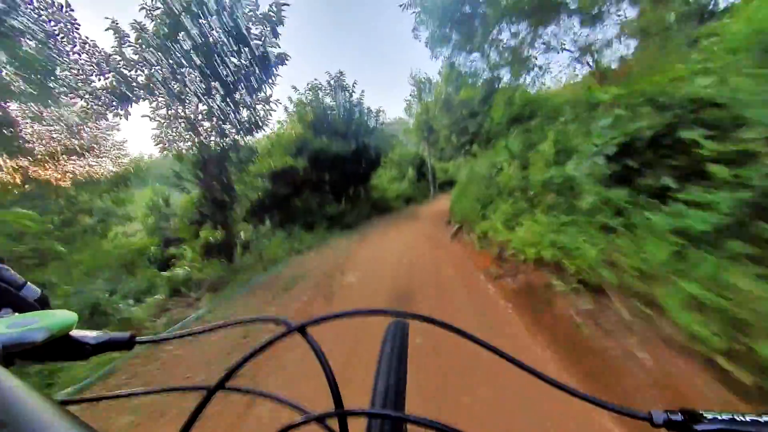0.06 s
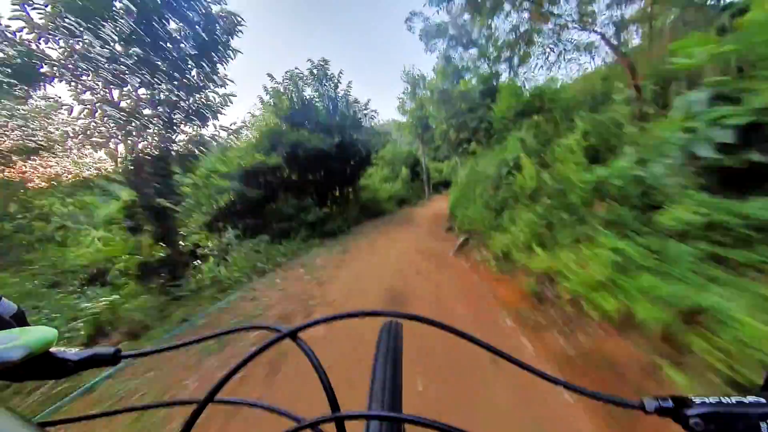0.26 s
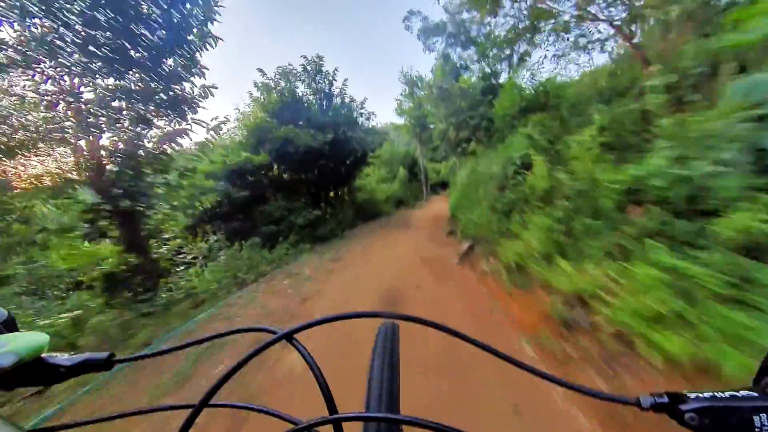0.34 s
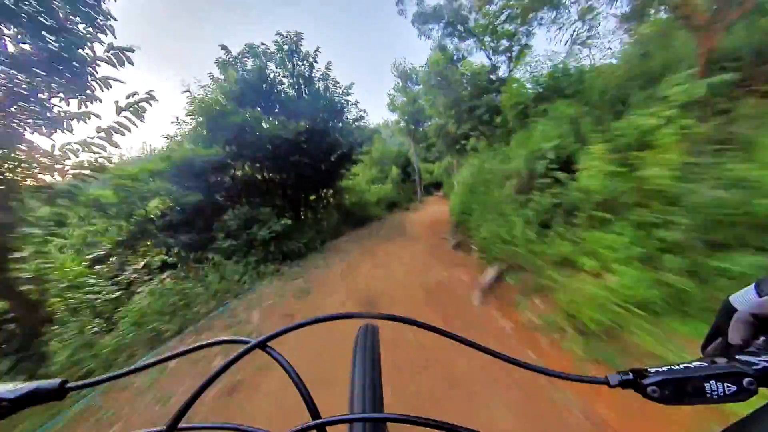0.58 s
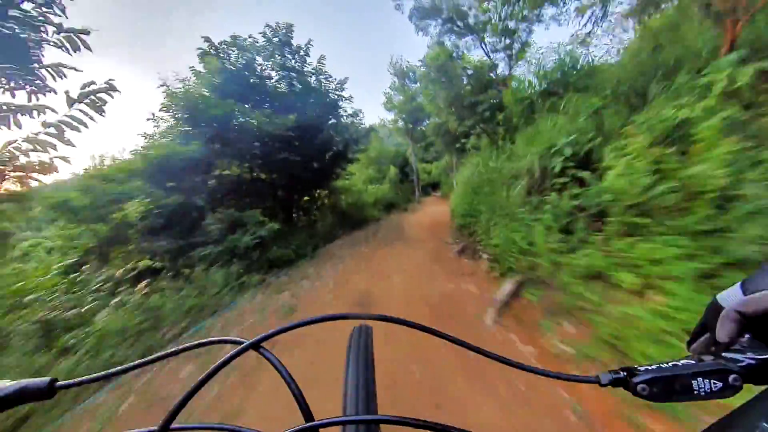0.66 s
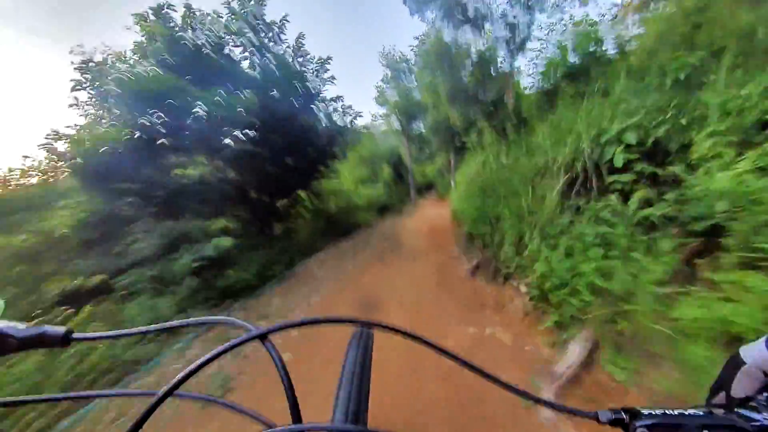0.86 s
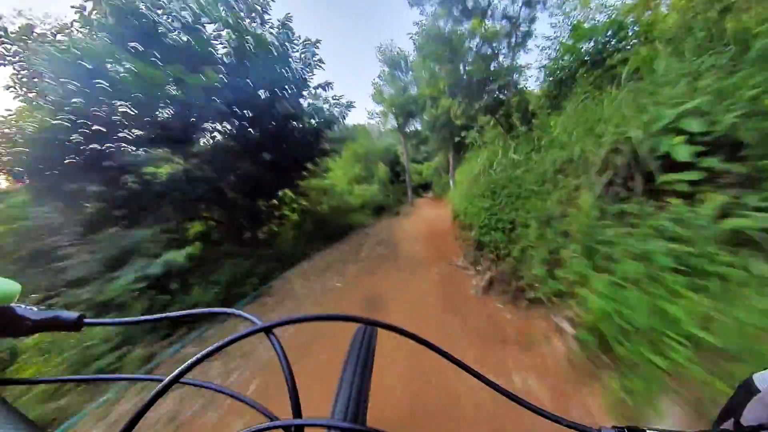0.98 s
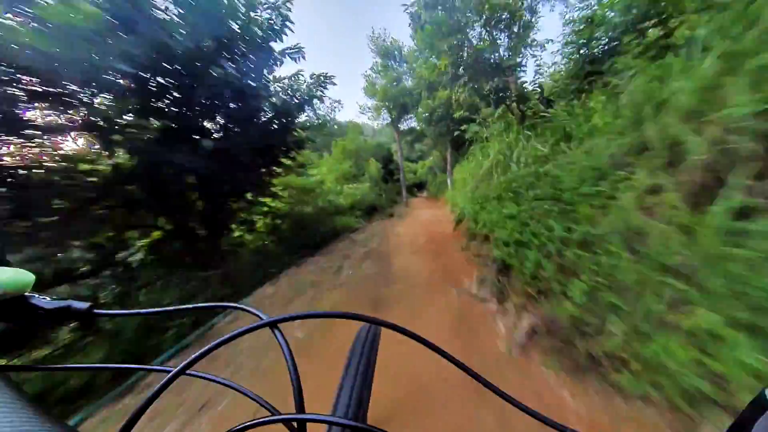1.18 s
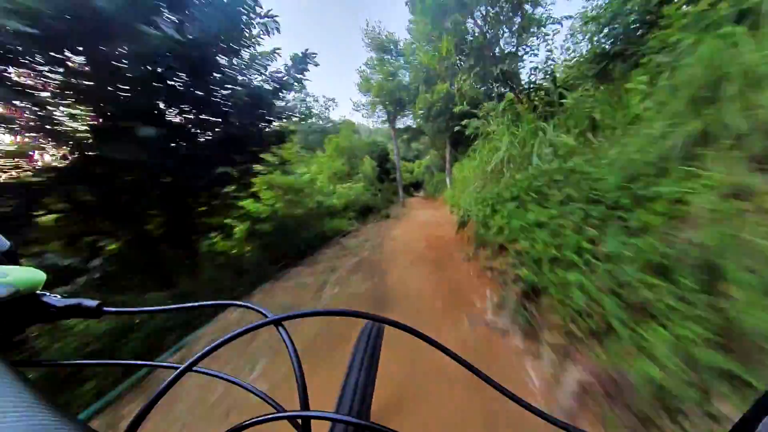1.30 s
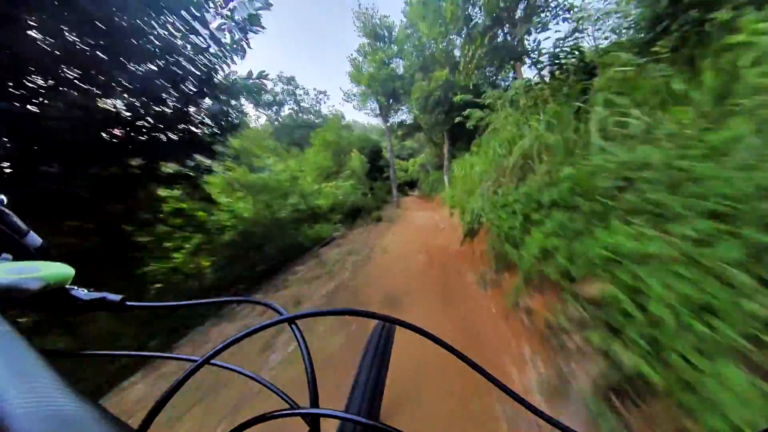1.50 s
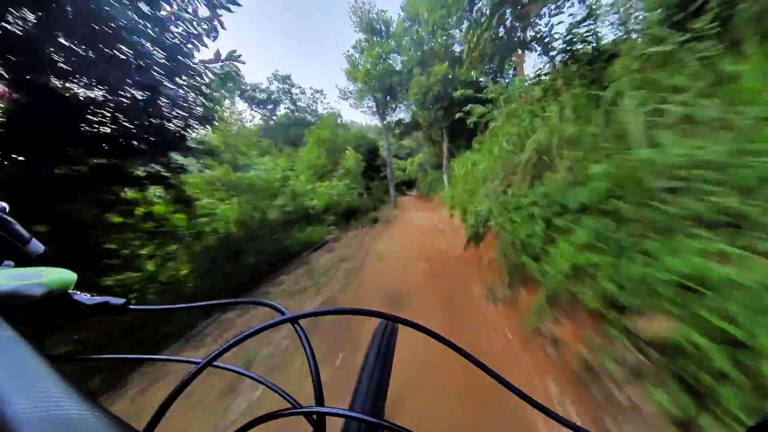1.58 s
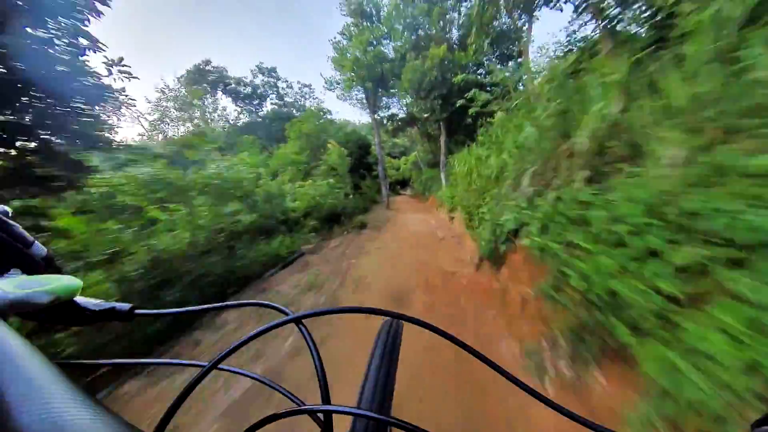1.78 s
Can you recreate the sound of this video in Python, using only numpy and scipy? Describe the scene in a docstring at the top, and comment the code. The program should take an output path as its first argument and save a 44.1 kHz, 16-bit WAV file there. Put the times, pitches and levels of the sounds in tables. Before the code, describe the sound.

A mountain bike hits two hard bumps on a dirt trail, each a hollow thump with a plastic clack and chain slap. Smaller knocks fall between them, then faint tyre rumble remains, heard from a microphone riding along.

```python
"""A mountain bike rolls down a dirt trail, heard from a camera riding with it.
It starts with tyre rumble, grit, a little wind and a thin whine. At 0.2 s a hard bump sets the camera
mount booming and its plastic joint clacking, enough to overload, and the chain slaps the frame.
Smaller knocks, thrown sand and faint brake chirps follow, then a second hard bump at 1 s.
Last, the ground gets smoother and quieter, and the mount hums briefly near 1.5 s."""
import sys
import numpy as np
from scipy import signal
from scipy.fft import rfft, irfft
from scipy.io import wavfile
from scipy.ndimage import uniform_filter1d

SR = 44100
rng = np.random.default_rng(int(sys.argv[2]) if len(sys.argv) > 2 else 0)


def dump_mix(stems):
    """Bounce the given channels to the path in sys.argv[1] as a 16-bit WAV at rate SR."""
    frames = np.atleast_2d(stems).T  # one column per channel
    limited = np.clip(frames, -1, 1)  # hard clip at full scale
    pcm = np.round(limited * 32767).astype(np.int16)
    wavfile.write(sys.argv[1], SR, pcm)


N = 81585
TIME = np.arange(N) / SR

# Bumps that shake the mount (time [s], level [dB], pitch [Hz], rise [s], fall [s], left over right [dB])
BUMPS = [(0.056, -36.5, 190, 0.012, 0.016, 40.5), (0.15, -30.5, 240, 0.0046, .014, -23.5),
         (0.2016, -2.5, 243, 0.0053, 0.01, -20), (0.305, -32, 221, .011, 0.0064, 8.5),
         (0.320, -30.5, 200, .007, .007, -5.5), (0.364, -18.5, 222, 0.0059, 0.0081, -34.5),
         (0.384, -37, 205, 0.0041, 0.02, -16), (0.649, -32.5, 281, 0.0051, 0.0036, 12),
         (0.663, -37.5, 303, 0.0032, 0.0037, 12), (0.699, -35, 225, 0.0072, 0.0098, 9),
         (0.718, -41.5, 214, 0.0068, 0.0077, 15), (0.956, -29, 229, .009, 0.0024, -14.5),
         (0.9957, -3.5, 260, 0.01, 0.0029, -18), (1.025, -45.5, 280, 0.0052, 0.017, -4),
         (1.145, -54.5, 310, 0.016, 0.017, -0.5)]
# Clacks of the plastic joint (time [s], level [dB], chatter length [s], pitch [ratio])
CLACKS = [(0.162, -41, 0.015, 1), (0.2035, -18, 0.0032, 1.073), (0.3222, -36.5, 0.013, 0.98),
          (0.364, -31, 0.0093, 0.994), (0.958, -48, 0.014, .97), (0.9985, -23.5, 0.0089, 1)]
# Tones the joint rings with (pitch [Hz], level [dB], time to fade 60 dB [s])
JOINT_TONES = [(728.7, 4, 0.02), (824, -9, 0.043), (936, -10.5, .022), (455, -9.5, .032),
               (1370, -25, 0.024)]
# Chain slaps (time [s], level [dB], length [s], brightest at [Hz], width [octaves], left over right [dB])
SLAPS = [(0.11, -61.5, 0.011, 1900, 0.61, -6.5), (0.131, -46.5, 0.017, 442, 0.62, 5),
         (0.133, -54.5, 0.019, 2500, 0.12, 8.5), (0.194, -37, 0.0075, 1480, 0.27, -7.5),
         (0.2053, -31.5, 0.0063, 847, .9, -15.5), (0.31, -60.5, 0.02, 1700, .7, -7.5),
         (0.356, -53.5, 0.029, 1200, 0.53, -15.5), (0.533, -73, 0.042, 2160, 0.54, -3),
         (0.658, -59, 0.013, 2360, 0.22, 17), (0.704, -73, 0.029, 2400, 0.31, 21),
         (0.847, -76, 0.013, 990, 0.14, 12), (0.949, -53, 0.025, 1280, 0.38, -14.5),
         (0.9908, -40, 0.0039, 1800, 0.13, -4.5), (0.997, -30, 0.015, 950, 0.95, -13),
         (1.0785, -53, 0.012, 1850, 0.74, -5.5), (1.134, -74.5, 0.03, 1410, 0.69, -12.5)]
# Tones the chain and frame ring with (pitch [Hz], level [dB], time to fade 60 dB [s])
FRAME_TONES = [(1000, -5.5, 0.066), (1110, -3.5, .022), (1263, -1.5, 0.062), (1303, -3, .022),
               (1580, -3, .026), (1848, -3, .028), (2080, -5, .024), (2170, -2.5, 0.037),
               (2790, -4.5, 0.01), (3400, -8.5, 0.024), (4150, -17, .028), (4790, -18, .03),
               (5750, -16.5, .03), (8400, -19.5, 0.027)]
# Tone colour of one link's tick (frequency [Hz], level [dB])
TICK_COLOUR = [(200, -6.5), (500, 2), (1500, 2.5), (2400, -8), (4000, -12), (8000, -14.5), (15000, -26.5)]
# Loudness of the tyre rumble (time [s], left [dB], right [dB])
RUMBLE_LEVELS = [(0, -36, -52), (0.08, -63, -46), (0.13, -39.5, -46), (0.27, -49.5, -51),
                 (0.43, -57, -52.5), (0.52, -52, -57.5), (0.6, -60.5, -55), (0.69, -48, -61),
                 (0.78, -53.5, -58), (0.85, -46, -70), (0.91, -60, -79), (1.05, -56.5, -56.5),
                 (1.16, -64, -59.5), (1.23, -71.5, -66.5), (1.58, -69, -63.5), (1.85, -72, -65.5)]
# Tone colour of the rumble on the left (frequency [Hz], level [dB])
RUMBLE_LEFT = [(25, -45.5), (70, -27), (110, -25), (150, -11), (185, -0.5), (250, 2), (330, -3.5),
               (420, -10), (520, -20), (700, -33.5), (1300, -57.5)]
# Tone colour of the rumble on the right (frequency [Hz], level [dB])
RUMBLE_RIGHT = [(25, -43.5), (70, -29.5), (110, -27.5), (150, -17), (185, 9), (240, -15), (330, -13),
                (420, -11.5), (520, -27), (700, -31.5), (1300, -55)]
# Weaker tones in the mount's hum (pitch [Hz], level against the main tone [dB])
HUM_TONES = [(85, -29.5), (400, -22.5), (790, -24.5)]
# How the grit swells and fades (time [s], crunch [dB], hiss [dB])
GRIT_LEVELS = [(0, -67, -74.5), (0.12, -63, -99.5), (0.28, -65.5, -87.5), (0.45, -68, -88.5),
               (0.55, -73.5, -87), (0.72, -75.5, -90), (0.82, -77, -106), (0.91, -83.5, -104.6),
               (1.05, -74, -90.5), (1.14, -74.5, -96), (1.25, -83, -104.3), (1.85, -88, -101.9)]
# Tone colour of the crunch (frequency [Hz], level [dB])
CRUNCH_COLOUR = [(300, -23), (560, -1), (850, 3.5), (1300, -5), (1800, -6), (2500, -7), (3100, -14),
                 (4000, -27), (7000, -52.5)]
# Tone colour of the hiss (frequency [Hz], level [dB])
HISS_COLOUR = [(2000, -20.5), (3800, -1.5), (5500, 3.5), (6600, 1.5), (8200, 1.5), (9500, -8.5),
               (14000, -5.5), (15500, -10.5)]
# Loudness of the whine (time [s], level [dB])
WHINE_LEVELS = [(0, -74.5), (.07, -76), (.17, -92.5), (.22, -70), (.33, -86.5), (.48, -84.5), (.62, -88.5),
                (.88, -85), (1.0, -95), (1.11, -78), (1.22, -101.5), (1.32, -89), (1.44, -99), (1.55, -90),
                (1.67, -101), (1.84, -90)]
# Chirps of the brake disc (time [s], width [s], level [dB])
CHIRPS = [(0.52, 0.044, -78.5), (0.598, 0.0067, -70), (0.669, 0.016, -75.5)]
# Loudness of the thrown sand (time [s], level [dB])
SAND_LEVELS = [(0, -100), (.28, -97), (.38, -81.5), (.68, -86), (.85, -92.5), (.95, -108), (1.85, -108)]
# Tone colour of the sand (frequency [Hz], level [dB])
SAND_COLOUR = [(5000, -31), (8500, -3), (11000, -4), (14500, 0.5), (15700, -1)]

SETTLE_HZ, SAG_S, AFTER_RING_DB, AFTER_RING_S, LEFT_LAG_S = 180, 0.014, -37, 0.014, 0.0012
LINKS_PER_S, TICK_DB, TICK_S, SLAP_RISE_S, MEDIUM_SLAP_DB = 1000, 10.5, 0.00067, 0.0024, -38.5


def mount_boom(db, hz, rise, fall, side_db):
    """A bump sets the mount swinging; the boom dies away as its pitch sinks."""
    t = np.maximum(TIME[:SR // 5] - np.array([[LEFT_LAG_S], [0]]), 0)
    late = np.maximum(t - rise, 0)
    pitch = hz + 0.99 * (SETTLE_HZ - hz) * (1 - np.exp(-(late / SAG_S) ** 1.1))
    swell = np.sin(np.pi / 2 * np.minimum(t / rise, 1)) ** 2
    fade = np.exp(-(late / fall) ** 1.1) + amp(AFTER_RING_DB) * np.exp(-late / AFTER_RING_S)
    tone = np.cos(2 * np.pi * np.cumsum(pitch * (t > 0), 1) / SR)
    return amp(db) * pan(side_db) * swell * fade * tone


def joint_clack(db, length, pitch, rise_s=0.002):
    """The plastic joint chatters for a moment, then its tones ring out."""
    t = TIME[:SR // 6]
    late = np.maximum(t - length, 0)
    ring = sum(amp(d - 60 * late / fade_s) * np.sin(2 * np.pi * (hz * pitch * t + rng.random((2, 1))))
               for hz, d, fade_s in JOINT_TONES)
    return amp(db) * pan(-21.5) * np.minimum(t / rise_s, 1) * ring


def chain_slap(db, length, bright_hz, octaves, side_db):
    """A run of links lands on the frame; each one ticks and makes it ring."""
    t = TIME[:SR // 8]
    jitter, size = rng.random(40), rng.standard_normal(40)
    lands_s = (np.arange(40) + jitter - jitter[0]) / LINKS_PER_S
    force = np.sign(size) * (.6 + abs(size) / 2) * np.exp(-(lands_s / length) ** 4)
    links = np.zeros(len(t))
    np.add.at(links, (lands_s * SR).astype(int), force)
    count = len(FRAME_TONES)
    phases = rng.random((count, 1, 1)) + rng.standard_normal((count, 2, 1)) / 4  # partly alike on each side
    ring = sum(amp(d - 60 * t / fade_s) * np.sin(2 * np.pi * (hz * t + phase))
               for (hz, d, fade_s), phase in zip(FRAME_TONES, phases))
    noise = colour(rng.standard_normal((2, len(t))), TICK_COLOUR)
    tick = 2 * amp(TICK_DB) * np.exp(-t / TICK_S) * unit(blend_sides(noise, 0.26))
    hit = signal.fftconvolve(links[None], ring + tick, axes=1)[:, :len(t)]
    hit *= np.minimum(t / SLAP_RISE_S, 1)
    f = np.fft.rfftfreq(2 * len(t), 1 / SR) + 1
    bright = np.exp(-.5 * (np.log2(f / bright_hz) / octaves) ** 2)
    # Harder slaps ring over a wider range of pitches.
    broad = amp(-16.5 + 0.74 * (db - MEDIUM_SLAP_DB)) / (1 + (f / 2980) ** 2)
    hit = irfft(rfft(hit, 2 * len(t)) * (bright + broad))[:, :len(t)]
    strength = np.sqrt((hit ** 2).sum(1, keepdims=True) / (SR * (length + .004)))
    return amp(db) * pan(side_db) * hit / strength


def echo_tail(knocks, db=-14.5, fade_s=0.031, rise_s=0.02):
    """A short noisy tail follows each knock, like quick echoes off the surroundings."""
    t = TIME[:SR // 6]
    tail = rng.standard_normal((2, len(t))) * amp(-60 * t / fade_s) * np.minimum(t / rise_s, 1)
    return amp(db) * signal.fftconvolve(knocks, tail / np.linalg.norm(tail[0]), axes=1)[:, :N]


def tyre_rumble():
    """Tyres and wind shake the mount, whose own note comes through on the right."""
    left, right = [unit(colour(rng.standard_normal(N), shape)) for shape in (RUMBLE_LEFT, RUMBLE_RIGHT)]
    right += amp(-0.5) * fuzzy_tone(hz=193.7, width_hz=18)[1]
    return np.array(level(RUMBLE_LEVELS)) * [steady(left), steady(right)]


def mount_hum(at_s=1.478, width_s=0.022, hz=187, db=-48):
    """On smoother ground the mount's own tones swell softly and fade."""
    tone = sum(amp(d) * np.sin(2 * np.pi * (f * TIME + rng.random())) for f, d in [(hz, 0)] + HUM_TONES)
    return amp(db) * pan(-20) * np.exp(-((TIME - at_s) / width_s) ** 2) * tone


def grit(grains_per_s=410, grain_share=0.13):
    """Grains of dirt crunch under the tread, over a fine hiss."""
    crunch_gain, hiss_gain = level(GRIT_LEVELS)
    grains = unit((rng.random((2, N)) < grains_per_s / SR) * rng.standard_normal((2, N)))
    dirt = np.sqrt(grain_share) * grains + np.sqrt(1 - grain_share) * rng.standard_normal((2, N))
    dirt = patchy(blend_sides(dirt, 0.15))
    crunch = amp(-1.5) * crunch_gain * unit(colour(dirt, CRUNCH_COLOUR))
    hiss = amp(5.5) * hiss_gain * unit(colour(dirt, HISS_COLOUR))
    return pan(-3) * (crunch + hiss)


def whine(hz=7450, sway_hz=120, wheel_turn_s=0.215, peak_s=1.31, flicker_db=1.5):
    """A thin flickering whine whose pitch sways about as fast as the wheels turn."""
    pitch = hz + sway_hz * np.cos(2 * np.pi * (TIME - peak_s) / wheel_turn_s)
    wobble = unit(uniform_filter1d(rng.standard_normal(N), size=1100))
    tone = unit(blend_sides(fuzzy_tone(pitch, width_hz=65), 0.4))
    return level(WHINE_LEVELS)[0] * unit(amp(flicker_db * wobble)) * tone


def brake_chirps():
    """The brake disc grazes its pads and sings faintly."""
    swell = sum(amp(db) * np.exp(-((TIME - s) / width) ** 2) for s, width, db in CHIRPS)
    return pan(14) * swell * fuzzy_tone(hz=5380, width_hz=58)


def sand(grains_per_s=1600):
    """Fine sand ticks off the tread in a soft sizzle."""
    grains = (rng.random(N) < grains_per_s / SR) * rng.standard_normal((2, N))
    return level(SAND_LEVELS)[0] * unit(colour(patchy(blend_sides(grains, 0.3)), SAND_COLOUR))


def amp(db):
    """Turns decibels into a gain to multiply by."""
    return 10 ** (np.asarray(db) / 20)


def unit(x):
    """Scales a sound to an average strength (rms) of 1."""
    return x / np.sqrt(np.mean(x ** 2) + 1e-20)


def pan(db):
    """Left and right gains, the louder at 1; positive dB leans left."""
    return amp([[min(db, 0)], [min(-db, 0)]])


def blend_sides(x, amount):
    """Mixes a little of each side into the other."""
    return x + amount * x[::-1]


def add(mix, s, sound):
    """Mixes a stereo sound in at time s."""
    part = mix[:, max(round(s * SR), 0):][:, :sound.shape[1]]
    part += sound[:, :part.shape[1]]


def colour(x, points):
    """Shapes lows and highs along a curve of (Hz, dB) points."""
    hz, db = np.transpose(points)
    f = np.fft.rfftfreq(x.shape[-1], 1 / SR)
    return irfft(rfft(x) * amp(np.interp(np.log(f + 1), np.log(hz), db)), x.shape[-1])


def level(rows):
    """One gain curve over time for each dB column of a table."""
    s, *columns = np.transpose(rows)
    return [amp(np.interp(TIME, s, db)) for db in columns]


def steady(x, span_s=0.089):
    """Evens out the slow chance swells of a noise."""
    return x / np.sqrt(abs(uniform_filter1d(x ** 2, int(span_s * SR))) + 1e-12)


def fuzzy_tone(hz, width_hz):
    """Noise in a band so narrow that it has a pitch."""
    noise = rng.standard_normal((2, N)) + 1j * rng.standard_normal((2, N))
    drift = signal.sosfilt(signal.butter(2, width_hz, fs=SR, output="sos"), noise)
    return unit((drift * np.exp(2j * np.pi * np.cumsum(hz * np.ones(N)) / SR)).real)


def patchy(x, depth_db=3.5):
    """Lets narrow bands of a sound come and go at random."""
    bands = signal.stft(x, nperseg=512)[2]
    patches = uniform_filter1d(rng.standard_normal(bands.shape[1:]), size=3, axis=0)
    patches = uniform_filter1d(patches, size=7, axis=1)
    return signal.istft(bands * amp(depth_db * unit(patches)), nperseg=512)[1][:, :N]


def cut_lows(x, hz, order):
    """Weakens everything below hz."""
    return signal.sosfilt(signal.butter(order, hz, "high", fs=SR, output="sos"), x)


def scene():
    """Booms and rattles on top of the rolling noise."""
    booms, rattles = np.zeros((2, 2, N))
    knocks = (booms, BUMPS, mount_boom), (rattles, CLACKS, joint_clack), (rattles, SLAPS, chain_slap)
    for track, table, source in knocks:
        for s, *row in table:
            add(track, s, source(*row))
    booms = cut_lows(booms, hz=130, order=2)  # the mount passes little deep bass
    rolling = tyre_rumble() + grit() + sand() + mount_hum() + whine() + brake_chirps()
    return booms + rattles + echo_tail(rattles) + rolling


def record(dry, overload_db=-6, knee=2.4, top_hz=15700):
    """The microphones overload softly on hard bumps; the deepest bass and top treble are cut."""
    ceiling = amp(overload_db) * (1 - 0.045 * np.sign(dry))  # one half of the wave is squeezed more
    squashed = dry / (1 + abs(dry / ceiling) ** knee) ** (1 / knee)
    treble_cut = signal.firwin(511, top_hz, window=("kaiser", 9), fs=SR)
    return signal.oaconvolve(cut_lows(squashed, hz=44, order=1), treble_cut[None], "same")


dry = scene()
out = record(dry)
dump_mix(out)
```